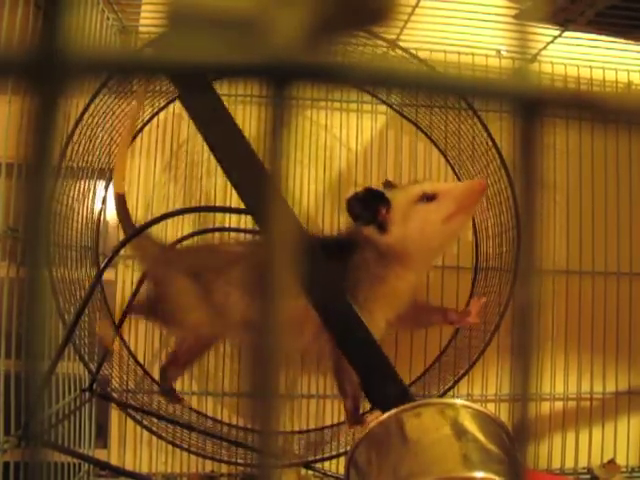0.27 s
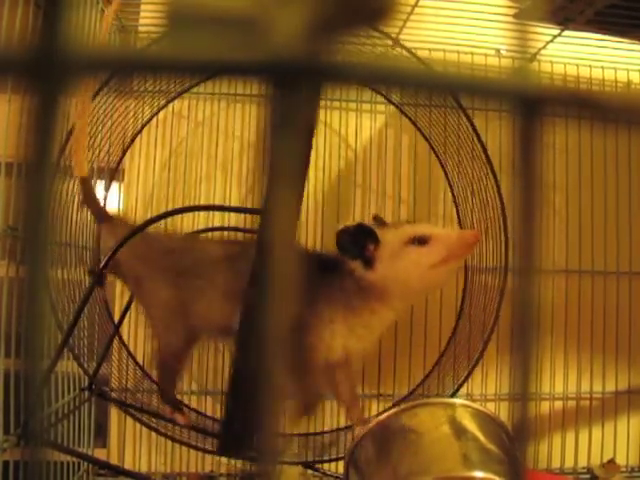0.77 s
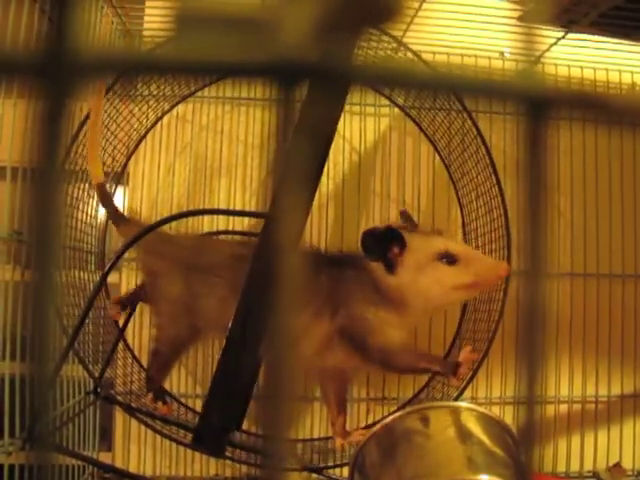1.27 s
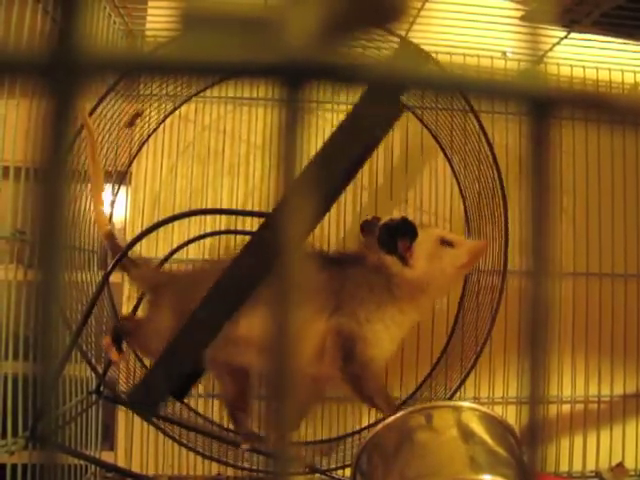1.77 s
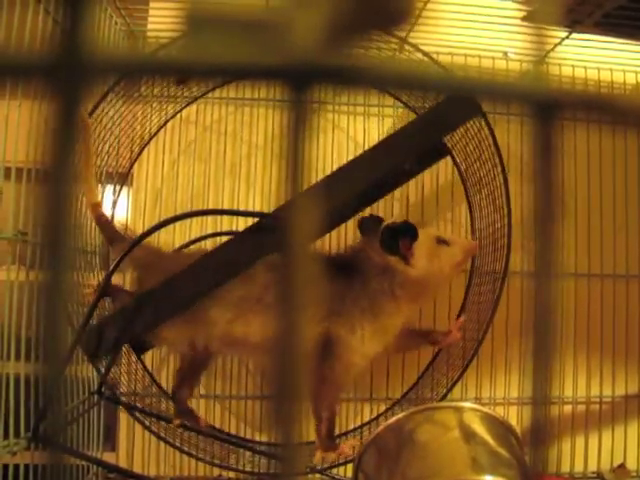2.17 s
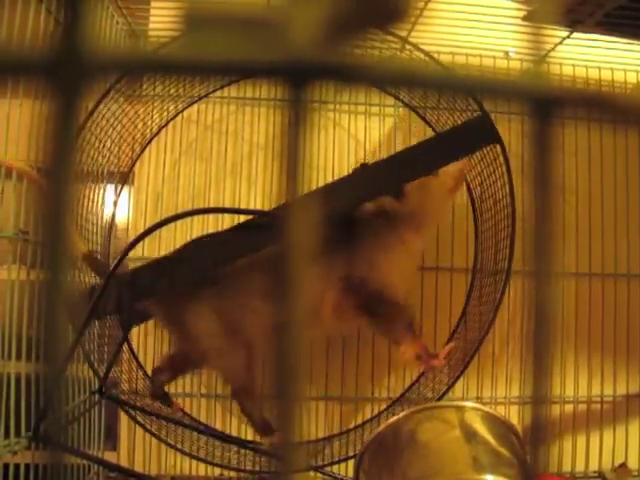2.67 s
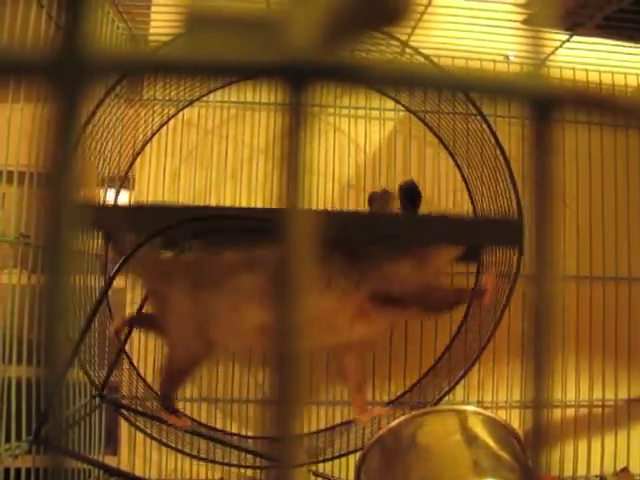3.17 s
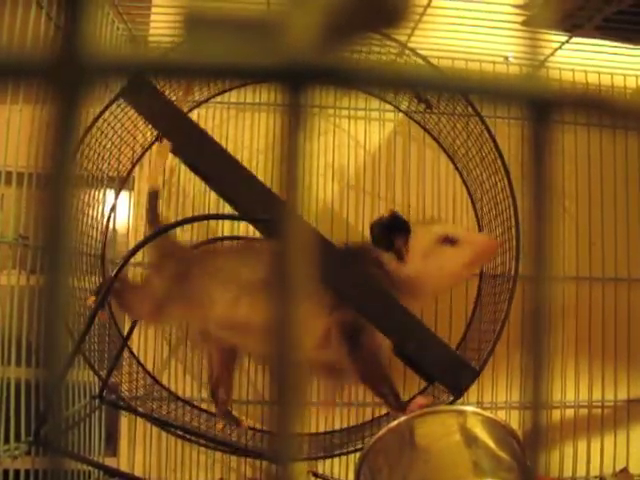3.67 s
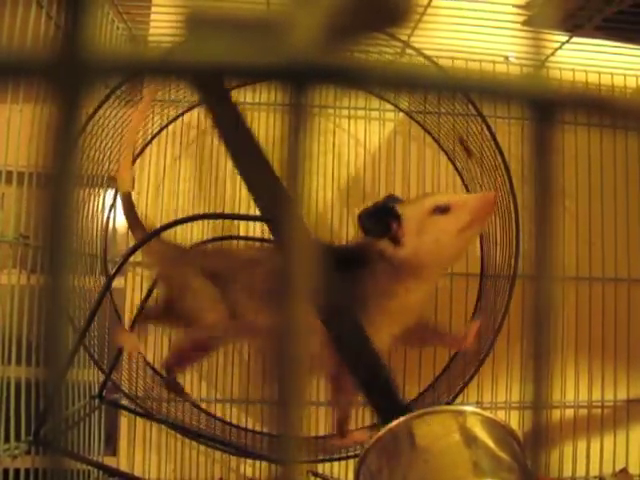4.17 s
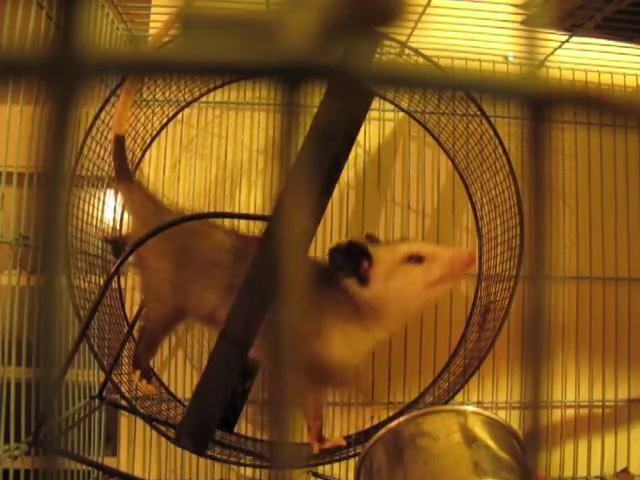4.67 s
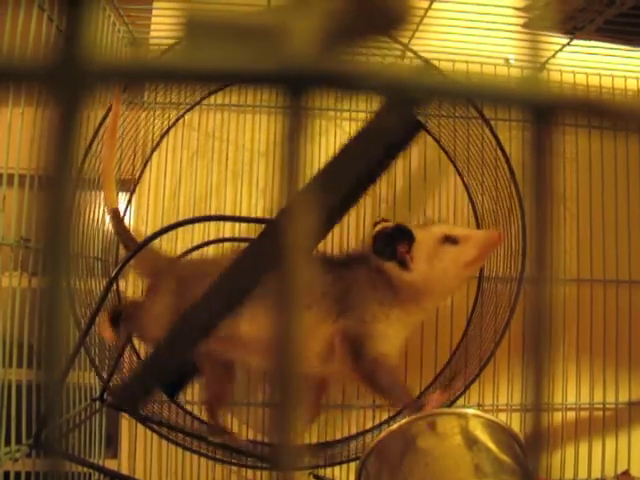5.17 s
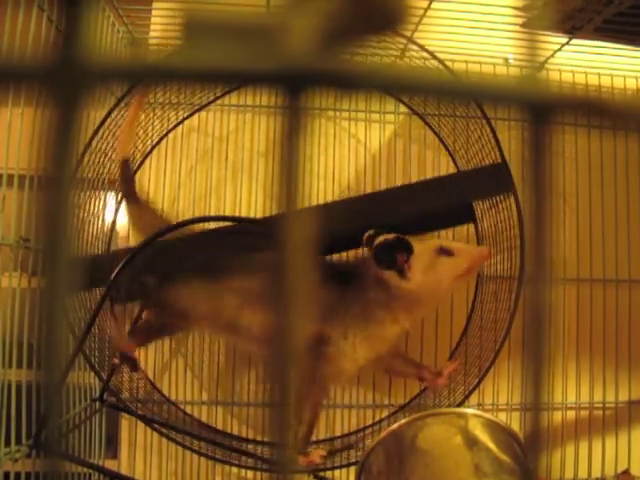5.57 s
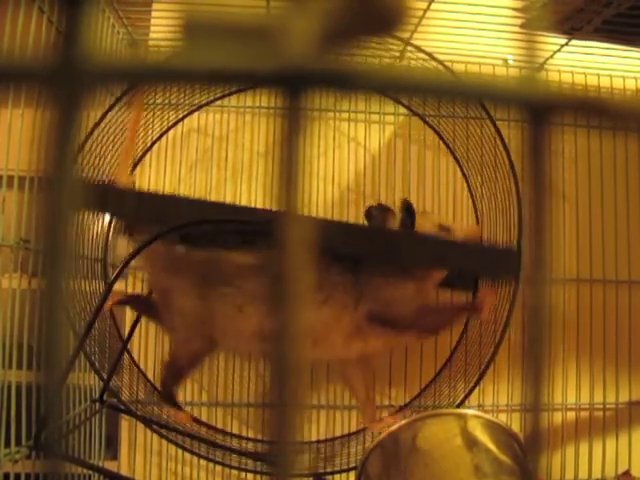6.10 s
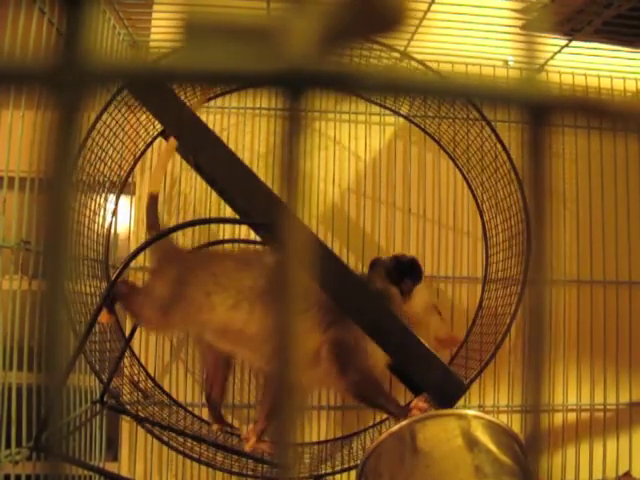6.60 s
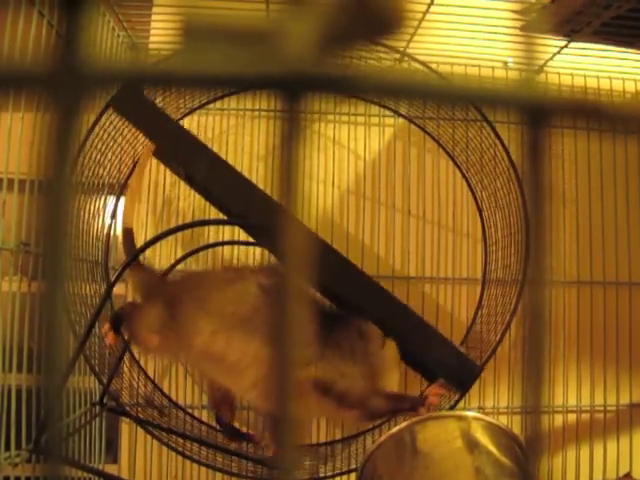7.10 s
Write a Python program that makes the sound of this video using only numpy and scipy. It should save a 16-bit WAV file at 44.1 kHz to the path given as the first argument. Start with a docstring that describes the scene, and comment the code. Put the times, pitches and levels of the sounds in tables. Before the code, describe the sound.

A lightweight wire wheel turns haltingly, ticking and rattling softly as claws tap and scrape its mesh. Two bright metal clinks stand out, one before and one after a pair of very high axle squeaks: the first rough and falling, the second clean and swelling. Low bumps and pad rubs come between. The close pickup also catches short cage echoes, soft fading air and a constant high electronic whine.

```python
"""Opossum in a wire exercise wheel

A young opossum walks in a wire-mesh wheel inside a cage, in a quiet room with a steady whine and hiss.
Wheel, stand, floor and crossbar: noise through resonances or spectra, driven by strides and slips.
Claws and pads: noise bursts and swells of random grains. Dry axle: unsteady tones, two main squeaks.
"""
import sys
import numpy as np
from scipy import signal
from scipy.fft import rfft, irfft, next_fast_len
from scipy.io import wavfile
from scipy.ndimage import map_coordinates

SR = 44100
rng = np.random.default_rng(int(sys.argv[2]) if len(sys.argv) > 2 else 0)


def waveform_to_disk(signal):
    """Save audio, clipped to [-1, 1], as 16-bit WAV at the path in sys.argv[1]."""
    frames = np.transpose(np.atleast_2d(signal))
    scaled = np.clip(frames, -1, 1) * 32767
    samples = np.round(scaled).astype(np.int16)
    wavfile.write(sys.argv[1], SR, samples)


N = 323692
TIME = np.arange(N) / SR
CREEP_DB = -78.5  # rattle of the wheel between spurts


def amp(db):
    """Decibels to gain."""
    return 10 ** (np.asarray(db) / 20)


def unit(x):
    """Scale to rms 1."""
    return x / np.sqrt(np.mean(x ** 2) + 1e-20)


def filtered(x, response):
    """x times a complex response of frequency, padded against wrap-around."""
    m = next_fast_len(N + SR // 2)
    return irfft(rfft(x, m) * response(np.fft.rfftfreq(m, 1 / SR)), m)[:N]


def coloured(x, points):
    """x through a spectrum of (Hz, dB) points, interpolated over log frequency."""
    f, db = np.transpose(points)
    return filtered(x, lambda hz: amp(np.interp(np.log(hz + 1), np.log(f), db)))


def cut(x, edge_hz, kind, order):
    """A causal Butterworth low-pass or high-pass."""
    sos = signal.butter(order, min(edge_hz, SR / 2 - 100), kind, fs=SR, output="sos")
    return signal.sosfilt(sos, x)


def resonate(x, modes):
    """x through a body: parallel (Hz, width Hz, dB) resonances of alternating sign."""
    def response(f):
        total = 0
        for k, (hz, width, db) in enumerate(modes):
            damping = 1j * f * width
            total = total + (-1) ** k * amp(db) * damping / (hz * hz - f * f + damping)
        return total
    return filtered(x, response)


def noise():
    """Fresh white noise."""
    return rng.standard_normal(N)


def wobble(rate_hz):
    """A smooth random curve through rate_hz knots a second."""
    knots = rng.standard_normal(int(N * rate_hz / SR) + 4)
    return map_coordinates(knots, [TIME * rate_hz])


def grains(rate_hz, spread_db):
    """Tiny impacts of uneven size at random moments, rms 1."""
    hits = rng.random(N) < rate_hz / SR
    size = amp(spread_db * np.clip(noise(), -2, 2))
    return unit(hits * np.sign(noise()) * size)


def burst(t60_s):
    """Half a second of noise that decays 60 dB in t60_s."""
    t = TIME[:SR // 2]
    return rng.standard_normal(len(t)) * amp(-60 * t / t60_s)


def add(track, s, sound):
    """Mix a sound in at s seconds."""
    part = track[max(round(s * SR), 0):][:len(sound)]
    part += sound[:len(part)]


def cage(x, wet_db, t60_s):
    """Add the short echo of the cage and the room: a decaying noise tail of unit energy."""
    tail = burst(t60_s) * (1 - np.exp(-TIME[:SR // 2] / 0.0014))
    return x + amp(wet_db) * signal.fftconvolve(x, tail / np.linalg.norm(tail))[:N]


def strokes(rows):
    """Summed Gaussian swells, one per (middle s, half length s, dB) row."""
    return sum(amp(db) * np.exp(-.5 * ((TIME - s) / half) ** 2) for s, half, db in rows)


def held(start_s, length_s, rise_db_per_s, fall_db_per_s):
    """Attack, hold and release, in dB below the hold."""
    rise = (TIME - start_s) * rise_db_per_s
    fall = (start_s + length_s - TIME) * fall_db_per_s
    return np.minimum(0, np.minimum(rise, fall))


def room():
    """Quiet room tone under a soft far rush of air that swells slightly, then slowly fades."""
    # air level: time_s, level_db
    air_level = [(0, -66), (1.2, -64.5), (2.2, -66.5), (2.7, -69), (3.7, -72), (5, -72.5), (7.34, -78.5)]
    # spectra: freq_hz, density_rel_db
    air_colour = [(30, -11), (130, -2.5), (350, -6), (650, -3), (1000, 5), (1500, -2), (2500, -8),
                  (4500, -13.5), (8000, -33)]
    room_colour = [(12, -38), (20, 0.5), (143, -3), (197, -6), (320, -4.5), (496, -6.5), (583, -10),
                   (718, -8), (1060, -9.5), (1340, -11), (5000, -16.5), (6500, -35), (11000, -120)]
    times_s, levels_db = np.transpose(air_level)
    air_db = np.interp(TIME, times_s, levels_db) + 1.54 * wobble(6.82)
    air = amp(air_db) * unit(coloured(noise(), air_colour))
    return air + amp(-68.5) * unit(coloured(noise(), room_colour))


def electronics():
    """Hiss and a steady whine; the whine dips briefly in level and phase 30 times a second."""
    # hiss spectrum: freq_hz, density_rel_db
    hiss_colour = [(3000, -39), (4500, -26), (5300, 3.5), (10000, 0.5), (11200, -9.5), (13000, 3),
                   (16000, -0.5)]
    whine_hz, dip_rate_hz, dip_width_s = 5880, 30, .00033
    from_dip_s = ((TIME * dip_rate_hz + .035) % 1 - .5) / dip_rate_hz
    dip = np.exp(-.5 * (from_dip_s / dip_width_s) ** 2)
    tone = np.sin(2 * np.pi * whine_hz * TIME - .5 * dip)
    whine = np.sqrt(2) * (1 - .5 * dip) * tone
    return amp(-56.0) * whine + amp(-70) * unit(coloured(noise(), hiss_colour))


def rolling():
    """How hard the wheel rattles, in dB: the strongest stride's spurt, or the creep between."""
    # spurts as strides push the wheel round: start_s, length_s, rattle_db
    spurt_rows = [(0.567, 0.19, -66), (1.74, .4, -57), (3.214, 0.21, -65), (4.133, .44, -62),
                  (5.4, 0.18, -67.5), (6.168, .1, -65), (6.405, 0.041, -58.5), (7.17, .06, -72.5)]
    spin_up_db_per_s, coast_db_per_s = 96, 173
    spurts = [db + held(s, length, spin_up_db_per_s, coast_db_per_s) for s, length, db in spurt_rows]
    return np.maximum(np.max(spurts, axis=0), CREEP_DB)


def chatter():
    """Loose mesh slips at random; its level follows the rattle of the wheel."""
    slips = grains(rate_hz=350, spread_db=6) * amp(rolling() + 3.5)
    return cut(cage(slips, wet_db=-1.5, t60_s=.056), 6300, "low", order=1)


def wheel():
    """Ticks and chatter sound directly and ring the wire wheel; its stand rumbles with the same motion."""
    # wire wheel resonances: freq_hz, width_hz, gain_db
    wheel_modes = [(600, 10, 2.5), (1100, 75, -3), (1257, 15, 3), (1490, 86, -13), (1813, 27, 6.5),
                   (1950, 78, 2), (2090, 120, -0.5), (2285, 24, 5), (2686, 84, -3.5), (2717, 20, 6.5),
                   (3043, 128, 3), (3647, 31, 7), (3960, 170, -5), (4450, 84, 2), (4916, 160, -2),
                   (5644, 88, 5.5), (6190, 270, -1.5), (6535, 24, 5.5), (7510, 290, -2.5), (8290, 310, 4),
                   (9330, 900, -0.5), (10700, 300, 0), (10860, 18, 8), (11150, 250, 1), (12900, 6500, -16)]
    # stand rumble spectrum: freq_hz, density_rel_db
    rumble_colour = [(40, -11), (120, -8), (190, -0.5), (250, 3), (330, -2.5), (450, -3), (800, -3),
                     (1400, -3), (2200, -14), (4000, -22)]
    creep_rumble_db, rumble_db_per_rattle_db = -76.5, 0.66
    growth_db = rumble_db_per_rattle_db * (rolling() - CREEP_DB)
    rumble_db = creep_rumble_db + growth_db + 2.2 * wobble(30)
    rumble = unit(coloured(noise(), rumble_colour)) * amp(rumble_db)
    contacts = ticks() + chatter()
    direct = amp(-12) * cut(contacts, 1200, "high", order=2)
    return resonate(contacts, wheel_modes) + direct + rumble


def taps():
    """Claw tips give dry, bright clicks, with a fainter patter that follows the wheel's motion."""
    # clearest claw taps on the mesh: time_s, tip_drive_db, wire_drive_db
    tap_rows = [(0.848, -56, -46.5), (1.4441, -44, -55), (1.517, -47, -60), (1.6307, -43, -58),
                (1.9121, -40, -52), (2.2134, -40.5, -66), (3.145, -44, -57), (4.1573, -41, -57),
                (5.2634, -45, -68), (5.545, -51, -51), (5.733, -44, -68), (6.2312, -42, -61),
                (6.337, -46, -62), (6.3996, -38.5, -49), (7.1432, -48, -55)]
    tips, wires = np.zeros((2, N))
    for s, tip_db, wire_db in tap_rows:
        click = burst(t60_s=.03) + amp(-16) * burst(t60_s=.15)
        add(tips, s + 0.0012, amp(tip_db + 3) * click)
        add(wires, s + 0.0005, amp(wire_db + 3) * click)
    steps = grains(rate_hz=45, spread_db=3.5)
    patter = unit(signal.fftconvolve(steps, burst(t60_s=.045))[:N])
    tips += patter * amp(-65 + 0.41 * (rolling() - CREEP_DB))
    tips = cut(cut(tips, 9300, "high", order=3), 8970, "low", order=4)
    return tips + cut(cut(wires, 1800, "high", order=2), 7900, "low", order=2)


def scratches():
    """A claw dragged along a wire catches many times in a brief swell."""
    # drags: middle_s, half_length_s, level_db
    scratch_rows = [(.197, 0.015, -53), (1.23, 0.038, -66), (2.303, 0.027, -50), (3.295, .013, -56),
                    (4.072, 0.015, -54.5), (5.155, .012, -60.5), (5.487, 0.0088, -55), (6.183, .031, -63)]
    # claw spectrum: freq_hz, density_rel_db
    claw_colour = [(1000, -33), (3000, -19), (4200, -9.5), (6500, -7.5), (8000, 2.5), (10200, 3.5),
                   (11300, -4), (13000, -1), (16000, -13.5)]
    rasp = unit(coloured(grains(rate_hz=4000, spread_db=3), claw_colour))
    return cage(strokes(scratch_rows) * rasp, wet_db=-8, t60_s=0.29)


def ticks():
    """A slipping wire cracks and the cage echoes it; treble has its own level for each slip."""
    # loudest wire slips: time_s, ring_drive_db, treble_drive_db
    tick_rows = [(.5232, -44, -49), (0.5837, -43.5, -52), (.6474, -56, -64), (.7114, -52, -64),
                 (1.6504, -46, -52), (1.693, -43, -57), (1.724, -45, -50), (1.7669, -45, -51),
                 (1.783, -45, -50), (1.8262, -41, -44.5), (1.8671, -40.5, -38.5), (1.9767, -41.5, -49),
                 (1.9931, -36.5, -45.5), (2.0507, -41, -62), (2.0866, -38, -40), (2.8494, -31, -38.5),
                 (3.078, -48, -72), (3.2221, -49, -51), (3.252, -51, -59), (3.2838, -45.5, -46),
                 (4.2867, -46, -71), (4.352, -46, -63), (4.3989, -50, -51), (4.4867, -43.5, -59),
                 (4.8874, -51.5, -80), (5.445, -36.5, -34)]
    body, treble = np.zeros((2, N))
    for s, ring_db, treble_db in tick_rows:
        hit = burst(t60_s=0.044) + amp(-10.5) * burst(t60_s=0.19)  # crack, echo
        add(body, s + .0007, amp(ring_db + 2.5) * hit)
        add(treble, s + .0007, amp(treble_db + 2.5) * hit)
    body = cut(body, 6380, "low", order=5)
    return body + cut(cut(treble, 6150, "high", order=5), 15300, "low", order=2)


def bumps():
    """Footfalls rock the wheel: soft-onset noise pushes thump its resonant stand."""
    # footfalls: time_s, drive_db
    bump_rows = [(0.561, -61), (1.99, -55), (3.18, -62), (3.248, -54), (3.305, -57), (3.415, -55.5),
                 (4.135, -57.5), (5.857, -47), (6.248, -53.5), (6.362, -51), (6.39, -52), (6.53, -55.5)]
    # stand resonances: freq_hz, width_hz, gain_db
    stand_modes = [(230, 420, -13.5), (574, 52, 1.5), (784, 130, -4.5), (994, 180, -3.5), (1456, 63, -7.5),
                   (2200, 500, -17)]
    rise_s, t60_s = 0.0032, 0.21
    push, t = np.zeros(N), TIME[:SR // 2]
    for s, db in bump_rows:
        add(push, s, amp(db) * burst(t60_s) * (1 - np.exp(-t / rise_s)))
    return amp(16.0) * resonate(push, stand_modes)


def scuffs():
    """A paw pad slipping over the mesh gives a duller, coarser rub."""
    # rubs: middle_s, half_length_s, level_db
    scuff_rows = [(.63, 0.027, -69), (3.305, 0.041, -61), (4.2, 0.047, -62.5), (4.39, .045, -64.5),
                  (6.257, 0.0055, -59), (6.405, 0.017, -59)]
    # pad spectrum: freq_hz, density_rel_db
    pad_colour = [(300, -11), (700, -15), (1400, 4), (2200, 0), (3500, -3), (5000, -10), (9000, -29)]
    rub = unit(coloured(grains(rate_hz=900, spread_db=3), pad_colour))
    return cage(strokes(scuff_rows) * rub, wet_db=-8.5, t60_s=0.14)


def crossbar():
    """The two hardest slips clink the wheel's flat steel crossbar, which rings brightly."""
    # clinks: time_s, drive_db
    clink_rows = [(2.8493, -36), (5.4454, -39)]
    # crossbar resonances: freq_hz, width_hz, gain_db
    bar_modes = [(900, 300, -10), (1820, 35, 5), (2330, 90, -1), (10650, 140, 0), (10850, 30, 12),
                 (11130, 80, 2)]
    blows = np.zeros(N)
    for s, db in clink_rows:
        add(blows, s, amp(db) * burst(t60_s=0.031))
    return amp(11) * resonate(blows, bar_modes)


def knocks():
    """The axle drops in its bearing with a clack and rings the stand's steel frame."""
    # knocks: time_s, drive_db
    knock_rows = [(4.144, -61), (4.225, -76), (5.352, -53), (5.382, -50), (5.39, -64)]
    # steel frame resonances: freq_hz, width_hz, gain_db
    frame_modes = [(766, 5.4, 4), (1414, 29, 3.5), (2197, 37, -2), (3060, 76, -12), (3400, 33, 0),
                   (5000, 130, -9), (5700, 180, -4), (8800, 200, -7.5)]
    blows = np.zeros(N)
    for s, db in knock_rows:
        add(blows, s, amp(db) * (burst(t60_s=0.084) + amp(-7.0) * burst(t60_s=0.21)))
    return amp(19) * resonate(blows, frame_modes) + amp(1.0) * cut(blows, 8400, "low", order=1)


def grip(start_s, length_s, db):
    """The gain of a squeak: it catches fast, holds and lets go."""
    return amp(db + held(start_s, length_s, rise_db_per_s=3000, fall_db_per_s=430))


def squeal(hz, jitter_hz, overtone_db):
    """Stick-slip of dry metal: an unsteady tone and its octave."""
    phase = 2 * np.pi * np.cumsum(hz + jitter_hz * wobble(600)) / SR
    return np.sqrt(2) * (np.sin(phase) + amp(overtone_db) * np.sin(2 * phase))


def axle():
    """A rough, stuttering squeak slides down amid short ringing tones; later one clean note swells."""
    # resonances set ringing by the slipping axle: start_s, length_s, pitch_hz, level_db
    ring_rows = [(4.39, .037, 6846, -38), (4.405, 0.024, 6327, -46), (6.259, .004, 2060, -62.5)]
    # swells of the note as the load bears on the axle: middle_s, half_length_s, level_db
    swell_rows = [(5.134, 0.0092, -31.5), (5.163, .0105, -28.5), (5.208, 0.013, -32), (5.244, 0.0035, -47),
                  (5.263, .005, -60)]
    slide_start_s, slide_length_s, slide_db = 4.374, .13, -52.5
    top_hz, bottom_hz, fall_hz_per_s = 7100, 5594, 14000
    song_start_s, song_length_s, song_db, song_hz = 5.1, 0.21, -61.5, 6848

    slide_hz = np.clip(top_hz - fall_hz_per_s * (TIME - slide_start_s), bottom_hz, top_hz)
    stutter = unit(amp(4.5 * np.tanh(wobble(170))))
    rasp = squeal(slide_hz + 50 * wobble(110), jitter_hz=120, overtone_db=-12)
    slide = grip(slide_start_s, slide_length_s, slide_db) * stutter * rasp

    rings = np.zeros(N)
    for s, length, hz, db in ring_rows:
        rings += grip(s, length, db) * squeal(hz, jitter_hz=5, overtone_db=-40)

    note = squeal(song_hz + 15 * wobble(55), jitter_hz=2, overtone_db=-18)
    song = (grip(song_start_s, song_length_s, song_db) + strokes(swell_rows)) * note
    return cage(slide, wet_db=-4, t60_s=0.091) + cage(rings + song, wet_db=-31, t60_s=0.25)


def scene():
    """The wheel and the animal over the room and the electronic whine and hiss."""
    animal = taps() + scratches() + scuffs() + bumps()
    metal = wheel() + crossbar() + knocks() + axle()
    return (metal + animal + room() + electronics())[None]


def record(dry):
    """Output response: a notch near 11.8 kHz, a duller top and a sharp band limit."""
    # output response: freq_hz, gain_db
    output_response = [(11200, 0), (11480, -7), (11780, -26), (12150, -11), (13000, -8), (15800, -9)]
    top_hz = 15850
    return filtered(coloured(dry[0], output_response), lambda hz: hz < top_hz)[None]


dry = scene()
out = record(dry)
waveform_to_disk(out)
```